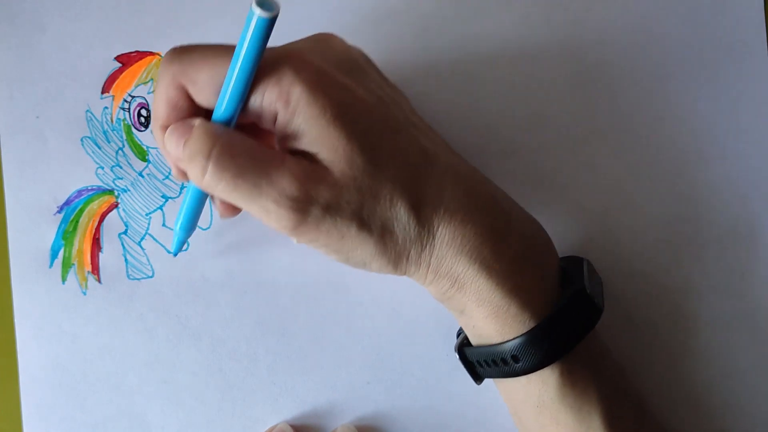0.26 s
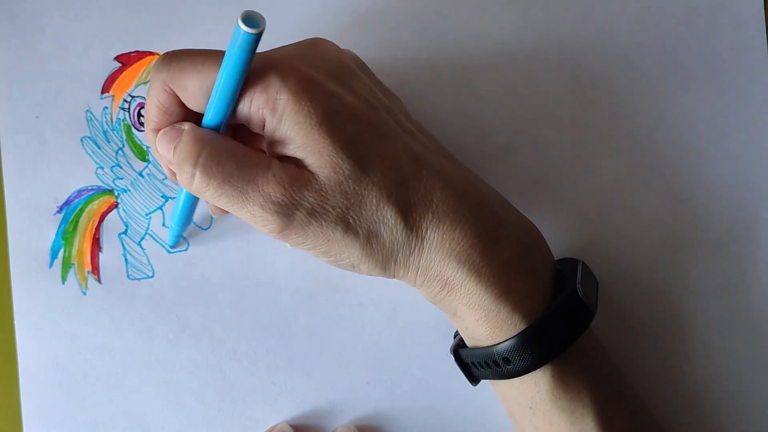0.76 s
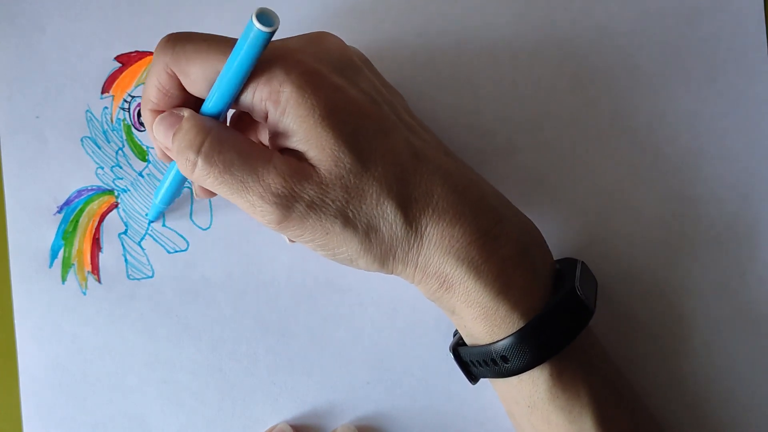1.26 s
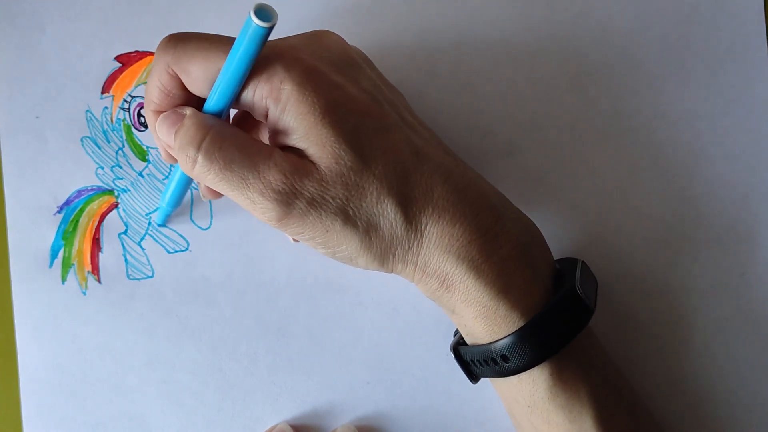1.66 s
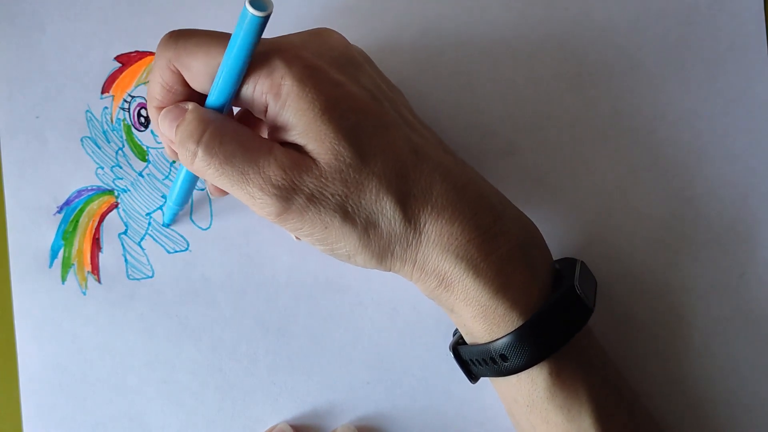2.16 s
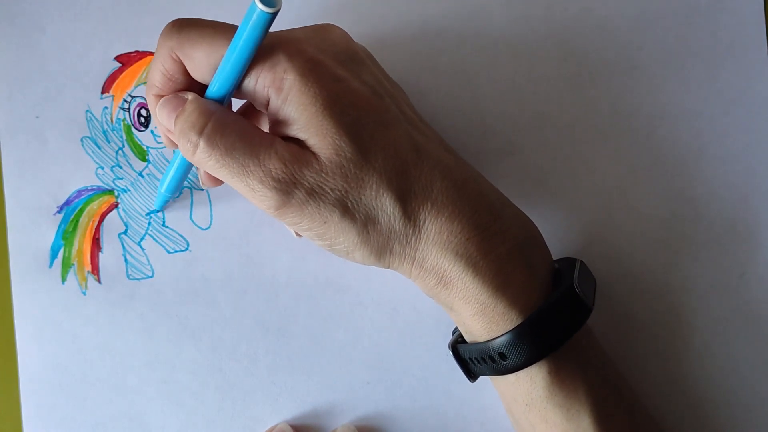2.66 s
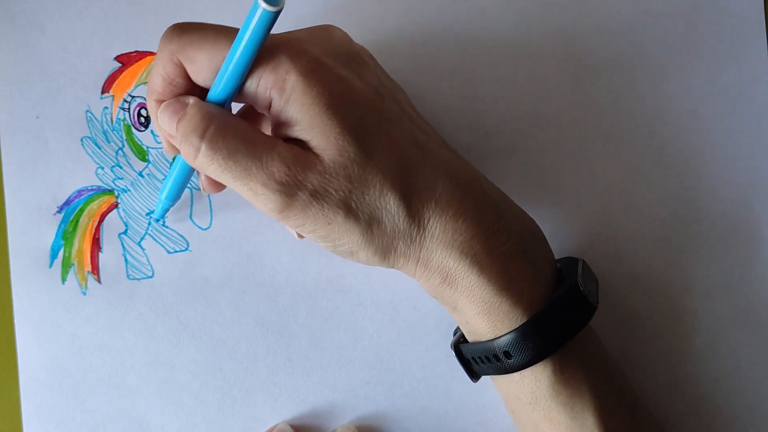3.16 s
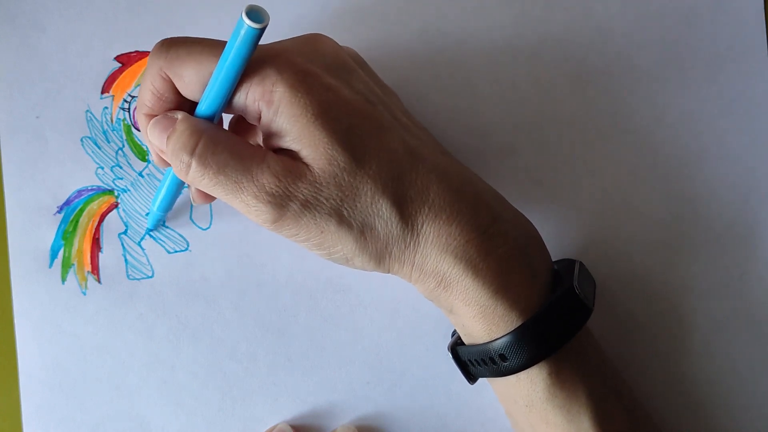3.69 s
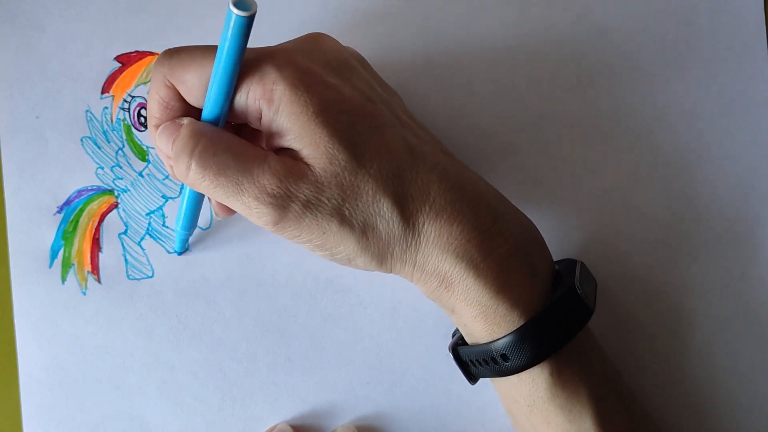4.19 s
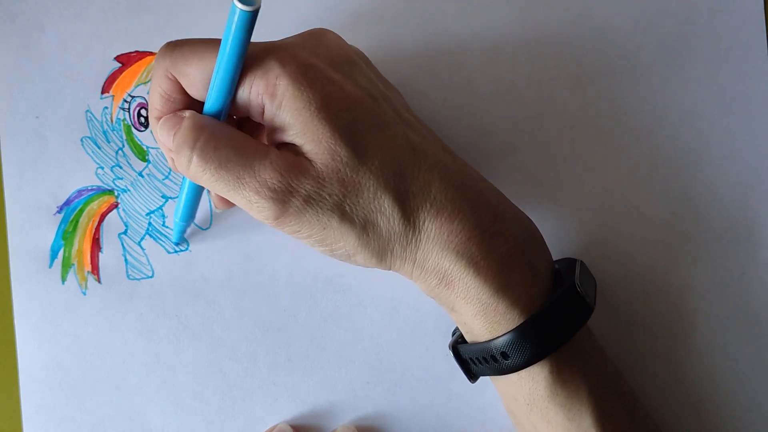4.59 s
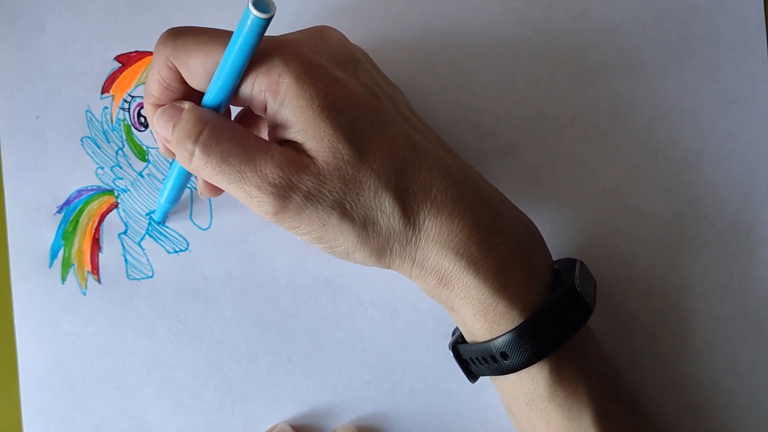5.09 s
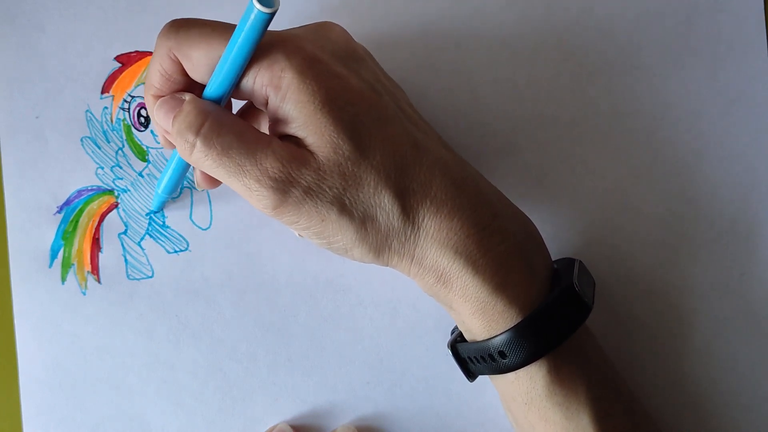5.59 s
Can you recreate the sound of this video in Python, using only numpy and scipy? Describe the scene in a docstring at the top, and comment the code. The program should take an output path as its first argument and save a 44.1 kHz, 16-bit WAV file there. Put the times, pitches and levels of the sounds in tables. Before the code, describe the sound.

Close mono sound of a marker nib rubbing paper on a desk indoors. First a soft scratch with a faint, thin, reedy buzz and a little tick, then firmer quick scrapes, then weaker brushing strokes with gaps and a very brief high squeak past the middle. Soft low hum, surging deep drone and steady hiss stay behind the whole time.

```python
"""Short scratchy felt-tip strokes on a sheet of paper, with one tick and one brief squeak; a thin,
faint buzz at first; room rumble, drone, mains hum and microphone hiss below.
Strokes: random fibre snaps ring sheet, barrel and felt resonances. Tick: decaying sines. Squeak: one
gliding sine. Buzz: banded overtones of a gliding pulse rate. Background: shaped noise and tones."""
import sys
import numpy as np
from scipy import signal
from scipy.fft import rfft, irfft, next_fast_len
from scipy.io import wavfile
from scipy.ndimage import uniform_filter1d

SR = 44100
rng = np.random.default_rng(int(sys.argv[2]) if len(sys.argv) > 2 else 0)


def transcribe(signal):
    """Save signal, clipped to [-1, 1], as a 16-bit WAV file at the path in sys.argv[1]."""
    frames = np.atleast_2d(signal).T
    limited = np.clip(frames, -1, 1)
    pcm = np.round(limited * 32767).astype(np.int16)
    wavfile.write(sys.argv[1], SR, pcm)


N = 257544

# resonances of the paper on the desk: (frequency [Hz], width [Hz], relative level [dB])
SHEET_MODES = [(410, 90, -0.5), (1080, 550, -5), (1576, 327, 0.5), (2040, 435, -1.5), (2634, 140, -1.5),
               (2914, 135, -5)]
# resonances of the pen barrel: (frequency [Hz], width [Hz], relative level [dB])
BARREL_MODES = [(3716, 430, -4), (4470, 105, 4), (4785, 485, 0.5), (5236, 480, 2.5), (5770, 420, -1.5)]


def gain_of(db):
    """Decibels to an amplitude factor."""
    return 10 ** (np.asarray(db) / 20)


def evened(x):
    """Scales to rms 1."""
    return x / np.sqrt(np.mean(x ** 2) + 1e-20)


def add(mix, start, sound):
    """Adds a sound in place from sample start, cut at the end of the mix."""
    part = mix[start:][:len(sound)]
    part += sound[:len(part)]


def resonate(x, hz, width_hz):
    """Resonance as a one-pole low-pass around a carrier: shift hz to zero, smooth, shift back."""
    carrier = np.exp(2j * np.pi * np.cumsum(hz * np.ones(len(x))) / SR)
    pole = np.exp(-np.pi * width_hz / SR)
    smooth = signal.lfilter([1 - pole], [1, -pole], x / carrier)
    return 2 * (carrier * smooth).real


def ring(x, modes):
    """Sum of parallel resonances with alternating sign, at rms 1."""
    total = 0
    for k, (hz, width_hz, db) in enumerate(modes):
        total = total + (-1) ** k * gain_of(db) * resonate(x, hz, width_hz)
    return evened(total)


def fibre_snaps(spread_db=1.8, grip_db=1.1, snaps_per_s=9000):
    """Fibres snap under the nib: random impulses of random size and sign, with uneven grip."""
    size = gain_of(spread_db * np.minimum(rng.exponential(1, N), 5)) * rng.choice([-1., 1.], N)
    grip = evened(uniform_filter1d(rng.standard_normal(N), size=150))
    hits = rng.random(N) < snaps_per_s / SR
    return size * hits * gain_of(grip_db * grip)


def pen_strokes():
    """Snaps ring sheet, barrel and felt; nib speed shapes level and balance of each stroke."""
    # strokes: (top speed reached [s], speeding up [s], held [s], slowing down [s],
    # barrel level at top speed [dB], sheet against barrel there [dB], felt against barrel there [dB])
    strokes = [ (0.31, 0.098, .04, 0.086, -75, -0.5, 0.5), (0.817, 0.026, 0.016, .07, -63, -4, -3.5),
               (1.164, 0.093, .008, 0.035, -64.5, -3, 0.5), (1.268, .03, .004, .02, -78, -12, 0),
               (1.432, 0.048, 0.014, 0.066, -62.5, -2, -1), (1.772, 0.041, .012, 0.058, -63, -2.5, -1.5),
               (2.193, 0.0054, 0.02, 0.031, -59.5, -3, -3.5), (2.445, .04, .006, 0.041, -69.5, 2, 0),
               (2.632, .04, .006, .05, -75, 4.5, -3), (2.816, .025, .004, .03, -77, 1, -3),
               (3.004, .02, .004, 0.033, -68.5, 0.5, -3), (3.628, 0.033, .014, 0.032, -74, 3.5, -5),
               (3.9, .032, .014, 0.044, -74.5, 0, -3), (4.222, .055, .004, 0.067, -70.5, -4, 0),
               (4.328, .025, .004, 0.028, -87, 0, 12), (4.578, .05, .01, 0.06, -70, 2.5, -0.5),
               (4.882, .024, 0.03, 0.047, -65.5, -2, -3), (5.211, .024, .004, 0.041, -67, -1.5, -0.5), ]
    # resonances of the felt nib: (frequency [Hz], width [Hz], relative level [dB])
    felt_modes = [(7140, 440, -6.5), (7560, 110, -3), (8930, 580, -5.5), (10130, 82, 2.5),
                  (10410, 350, -2.5), (11350, 280, -4.5), (11960, 460, -3.5), (14600, 1500, -11)]
    ends_db, arch_power = -21, 1.6  # barrel level at both ends re top; roundness of the top
    sheet_share = 0.74  # the sheet follows the speed less than the barrel
    sheet_tilt_db, felt_tilt_db = 1, 7.5  # rise against the barrel, from top speed to stroke end

    snaps = fibre_snaps()
    sheet, barrel, felt = ring(snaps, SHEET_MODES), ring(snaps, BARREL_MODES), ring(snaps, felt_modes)
    out = np.zeros(N)
    for top_s, rise_s, hold_s, fall_s, db, sheet_db, felt_db in strokes:
        t = np.arange(-rise_s, hold_s + fall_s, 1 / SR)
        # -1 at the start, 0 at top speed, 1 at the end
        place = np.where(t < 0, t / rise_s, np.maximum(t - hold_s, 0) / fall_s)
        arch_db = ends_db * abs(place) ** arch_power
        start = round((top_s - rise_s) * SR)
        cut = slice(start, start + len(t))
        sheet_gain = gain_of(sheet_db + sheet_share * arch_db + sheet_tilt_db * place)
        felt_gain = gain_of(felt_db + arch_db + felt_tilt_db * place)
        body = gain_of(arch_db) * barrel[cut] + sheet_gain * sheet[cut]
        body = body - felt_gain * felt[cut]  # mode signs keep alternating
        add(out, start, gain_of(db) * body * signal.windows.tukey(len(t), .12))
    return out


def nib_touch(t60_s=0.01):
    """The nib lands: a tick of decaying sines at upper sheet and lower barrel resonances."""
    # landings: (time [s], peak level [dB])
    landings = [(0.2622, -53)]
    out, t = np.zeros(N), np.arange(1500) / SR
    tick = np.zeros(len(t))
    for hz, _, db in SHEET_MODES[2:] + BARREL_MODES[:2]:
        tick += gain_of(db - 60 * t / t60_s) * np.sin(2 * np.pi * hz * t)
    for time_s, db in landings:
        add(out, round(time_s * SR), gain_of(db) * tick / abs(tick).max())
    return out


def squeak():
    """The nib sticks and slips for a moment: one sine of nearly constant pitch."""
    # squeak path: (time [s], rms level [dB], frequency [Hz])
    path = [(3.565, -90, 9080), (3.572, -72, 9100), (3.598, -71, 9130), (3.603, -95, 9130)]
    time_s, db, hz = np.transpose(path)
    t = np.arange(time_s[0], time_s[-1], 1 / SR)
    phase = 2 * np.pi * np.cumsum(np.interp(t, time_s, hz)) / SR
    out = np.zeros(N)
    add(out, round(time_s[0] * SR), np.sqrt(2) * gain_of(np.interp(t, time_s, db)) * np.sin(phase))
    return out


def buzz(rough=.45, jitter=.003):
    """Quick pulses: overtones of a gliding rate, weighted by bands around a centre and above."""
    # notes: (start [s], length [s], fade-out [s], level before flutter [dB],
    # pulse rate at the start [1/s], settled pulse rate [1/s], centre [Hz], spread [Hz])
    notes = [(0, .166, .008, -71.5, 338, 369, 5250, 820), (.164, .49, .02, -73.5, 335, 299, 4610, 480),
             (.644, .395, .02, -73.5, 357, 337.5, 4620, 580), (1.029, .27, .08, -74.5, 317, 309, 4630, 520)]
    # bands: (multiple of the centre [1], factor on the spread [1], relative level [dB])
    bands = [(1, 1.5, 2), (2, 1.8, 0.5), (3.1, 3.3, -1.5)]
    settle_s, rise_s = .14, 0.0053  # time constant of the glide; fade-in
    unsteady = 2.5  # extra jitter at note start, as a multiple of jitter

    k, out = np.arange(8, 56)[:, None], np.zeros(N)  # overtone numbers
    for start_s, length_s, fade_s, db, first_hz, settled_hz, centre_hz, spread_hz in notes:
        t = np.arange(0, length_s, 1 / SR)
        settling = np.exp(-t / settle_s)
        rate_hz = settled_hz + (first_hz - settled_hz) * settling
        drift = evened(uniform_filter1d(rng.standard_normal(len(t)), size=200))
        turns = np.cumsum(rate_hz * (1 + jitter * (1 + unsteady * settling) * drift)) / SR
        weights = 0
        for multiple, widen, band_db in bands:
            offset = (k * rate_hz - multiple * centre_hz) / (widen * spread_hz)
            weights = weights + gain_of(band_db) * np.exp(-offset ** 2)
        # each overtone wavers on its own
        flutter = evened(uniform_filter1d(rng.standard_normal((len(k), len(t))), size=150, axis=1))
        body = (weights * (1 + rough * flutter) * np.cos(2 * np.pi * k * turns)).sum(0)
        body = body / np.sqrt((weights ** 2).sum(0) / 2)
        edges = np.clip(np.minimum(t / rise_s, (length_s - t) / fade_s), 0, 1)
        add(out, round(start_s * SR), gain_of(db) * edges * body)
    return out


def room(patchy_db=1.0, rms_db=-58.5):
    """Noise falling from rumble to microphone hiss, with faint patches in time and frequency."""
    # noise spectrum: (frequency [Hz], relative density [dB per Hz])
    spectrum = [(15, -7), (30, -9.5), (58, -18.5), (95, -23), (200, -28.5), (400, -33.5), (750, -37),
                (1600, -41.5), (2700, -43.5), (6000, -47.5), (15500, -50)]
    hz, db = np.transpose(spectrum)
    size = next_fast_len(N)
    bins_hz = np.fft.rfftfreq(size, 1 / SR)
    colour = gain_of(np.interp(np.log(bins_hz + 1), np.log(hz + 1), db, left=-60))
    air = irfft(rfft(rng.standard_normal(size)) * colour, size)
    z = signal.stft(air, nperseg=512)[2]
    patches = uniform_filter1d(rng.standard_normal(z.shape), size=8, axis=0)
    patches = evened(uniform_filter1d(patches, size=8, axis=1))
    patchy = signal.istft(z * gain_of(patchy_db * patches), nperseg=512)[1][:N]
    return gain_of(rms_db) * evened(patchy)


def pressure_sway():
    """Slow pressure swings below hearing: noise through two resonances, with a level curve."""
    # swing level: (time [s], level [dB])
    level = [(0.0, -56.5), (0.36, -40), (0.52, -49), (3.97, -53.5), (4.06, -77), (4.24, -54.5),
             (5.41, -54.5), (5.45, -72), (5.84, -53)]
    swings = evened(resonate(resonate(rng.standard_normal(N), 4.5, 11.), 4.5, 11.))
    return swings * gain_of(np.interp(np.arange(N) / SR, *np.transpose(level)))


def drone(centre_hz=39.98, wander_hz=0.74):
    """Low surging drone: a sine whose pitch wanders with slow noise."""
    # drone level: (time [s], rms level [dB])
    level = [(0.0, -73), (0.08, -62), (1.15, -62.5), (1.71, -53), (1.8, -70), (2.0, -55), (2.26, -70),
             (2.34, -59), (2.5, -56), (2.62, -70), (2.71, -59), (3.35, -65), (3.45, -50.5), (3.59, -51.5),
             (3.76, -65), (3.85, -57), (3.94, -54), (4.0, -80), (4.26, -53), (4.39, -66), (4.68, -54),
             (4.77, -69), (4.93, -56.5), (5.84, -56.5)]
    wander = evened(resonate(rng.standard_normal(N), 0, 3.67))
    tone = np.sqrt(2) * np.sin(2 * np.pi * np.cumsum(centre_hz + wander_hz * wander) / SR)
    return tone * gain_of(np.interp(np.arange(N) / SR, *np.transpose(level)))


def wavering_hums():
    """Wavering tones: noise passed twice through a narrow resonance."""
    # hums: (frequency [Hz], width of each pass [Hz], rms level [dB])
    hums = [(99.7, 8.4, -76.5), (408.4, 21, -87.5), (1558, 13, -92)]
    out = np.zeros(N)
    for hz, width_hz, db in hums:
        narrow = resonate(resonate(rng.standard_normal(N), hz, width_hz), hz, width_hz)
        out += gain_of(db) * evened(narrow)
    return out


def mains():
    """Steady sines of mains and appliances."""
    # tones: (frequency [Hz], rms level [dB])
    tones = [(50, -65.5), (100.5, -76), (1568, -90.5)]
    t = np.arange(N) / SR
    return sum(np.sqrt(2) * gain_of(db) * np.sin(2 * np.pi * hz * t) for hz, db in tones)


def scene():
    """Sum of all sources in one channel."""
    near = pen_strokes() + nib_touch() + squeak() + buzz()
    background = room() + pressure_sway() + drone() + wavering_hums() + mains()
    return (near + background)[None]


def record(dry, edge_hz=15740):
    """Band limit: a steep linear-phase low-pass."""
    lowpass = signal.firwin(2047, edge_hz, window=("kaiser", 9), fs=SR)
    return signal.oaconvolve(dry, lowpass[None], "same")


dry = scene()
out = record(dry)
transcribe(out)
```